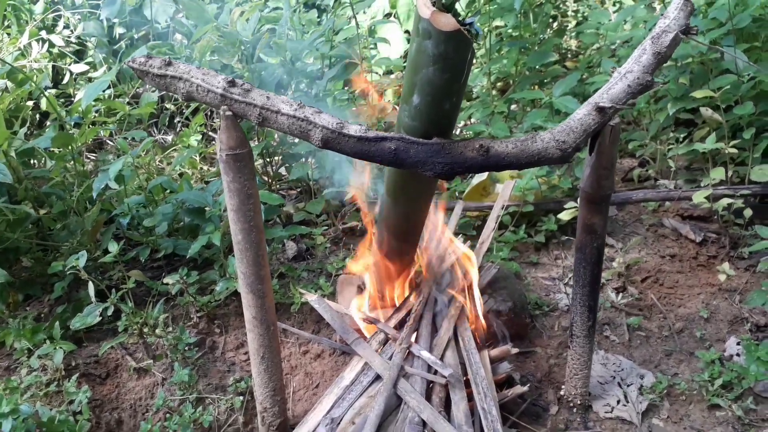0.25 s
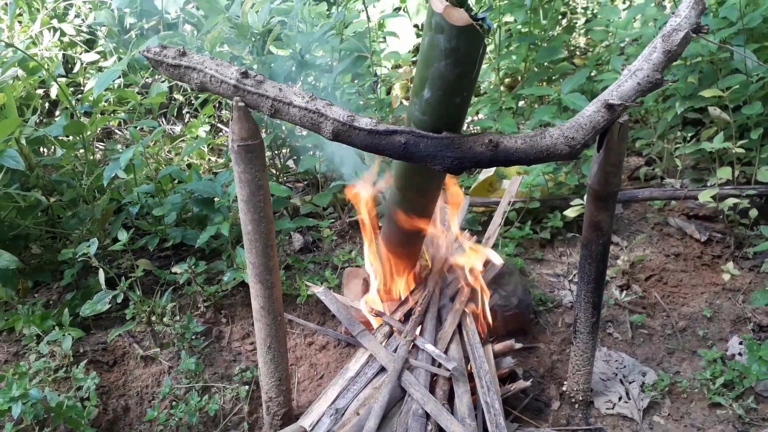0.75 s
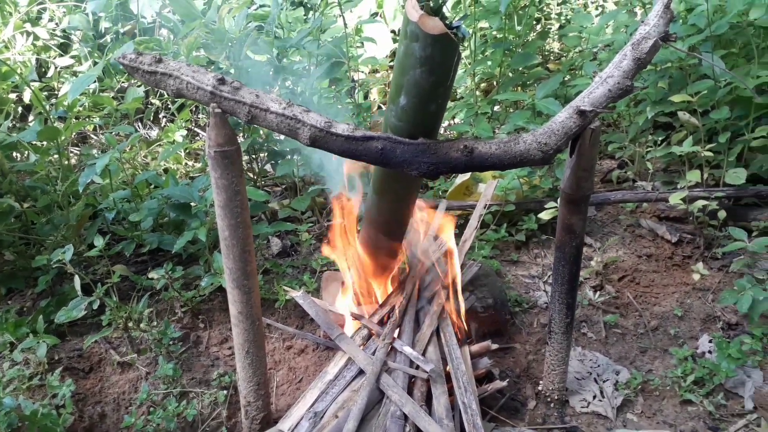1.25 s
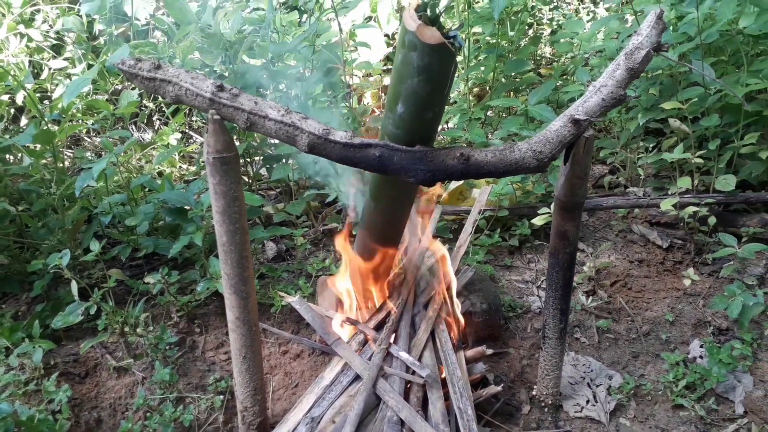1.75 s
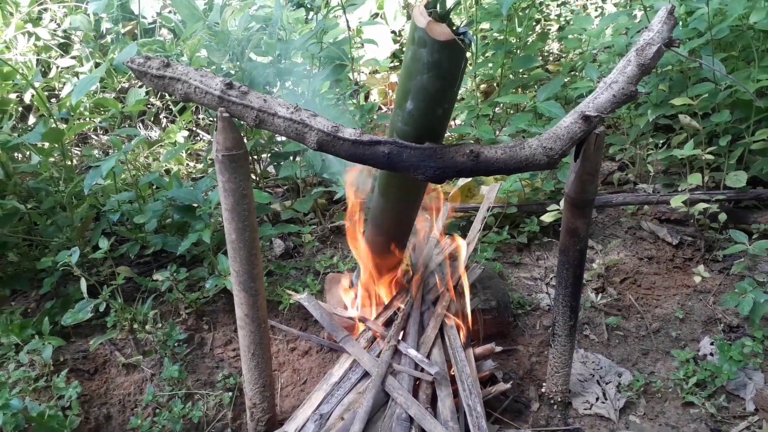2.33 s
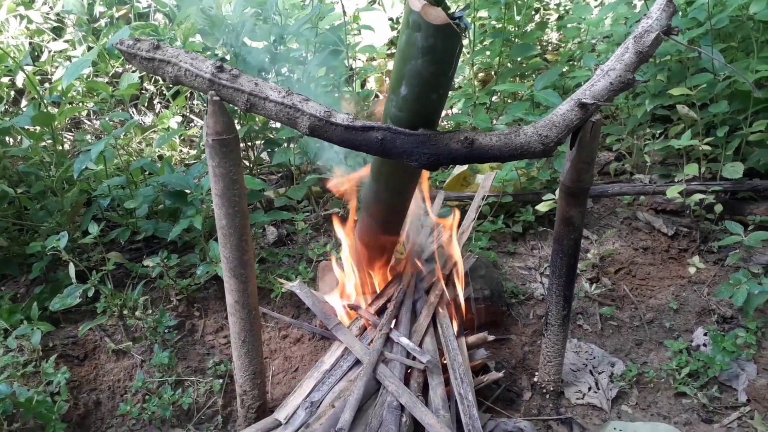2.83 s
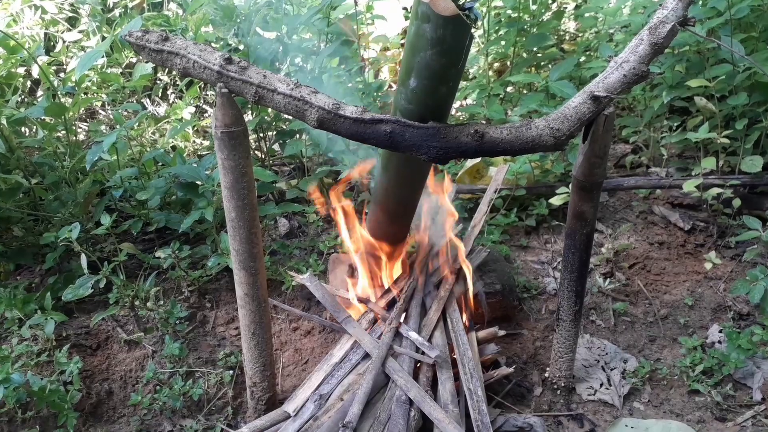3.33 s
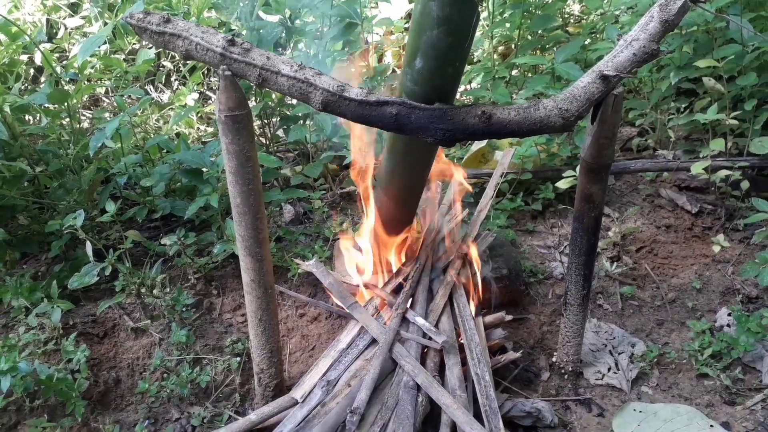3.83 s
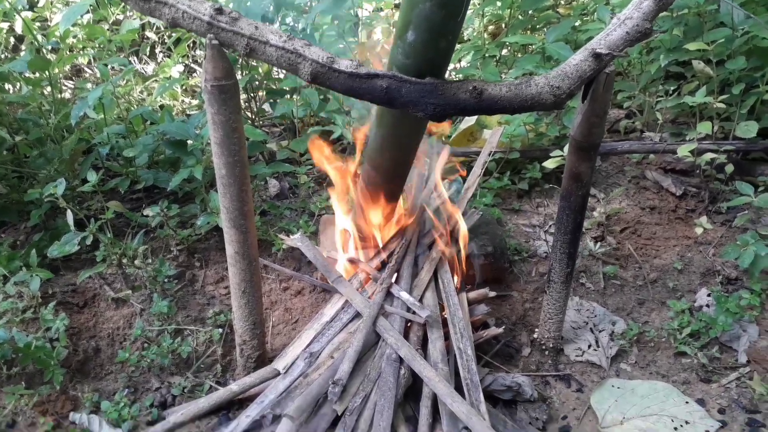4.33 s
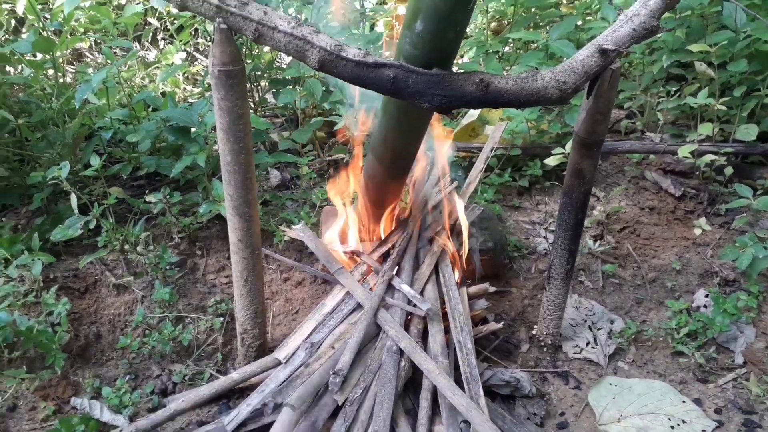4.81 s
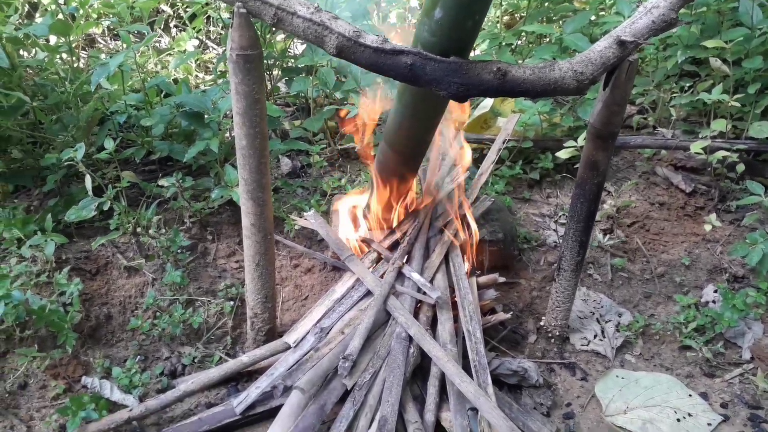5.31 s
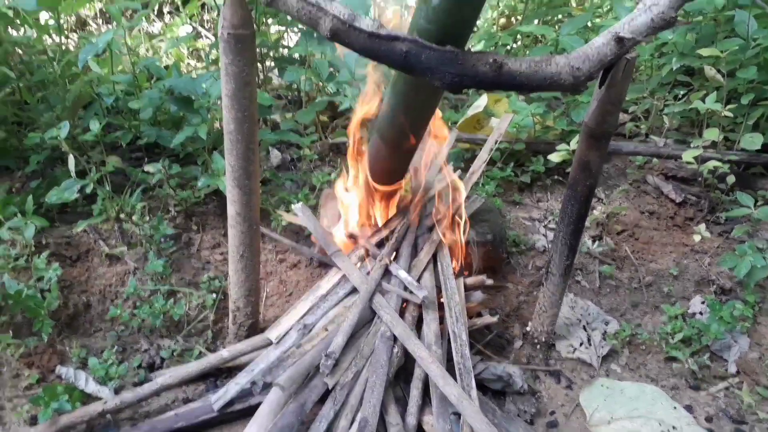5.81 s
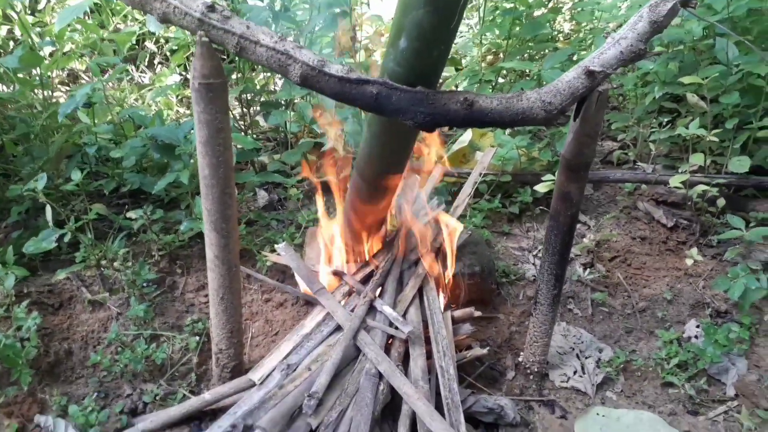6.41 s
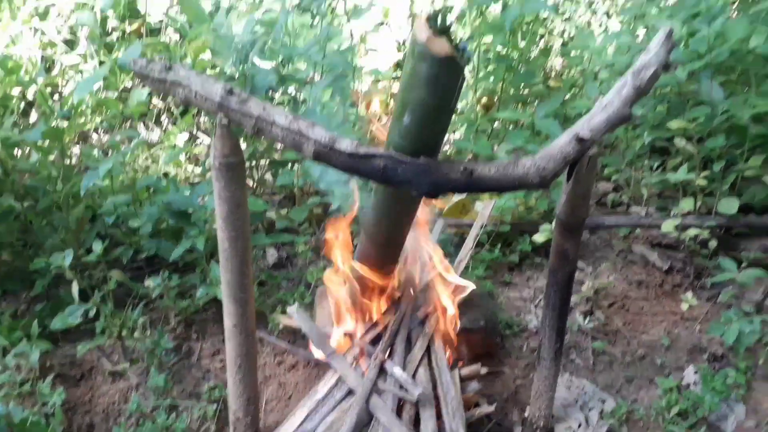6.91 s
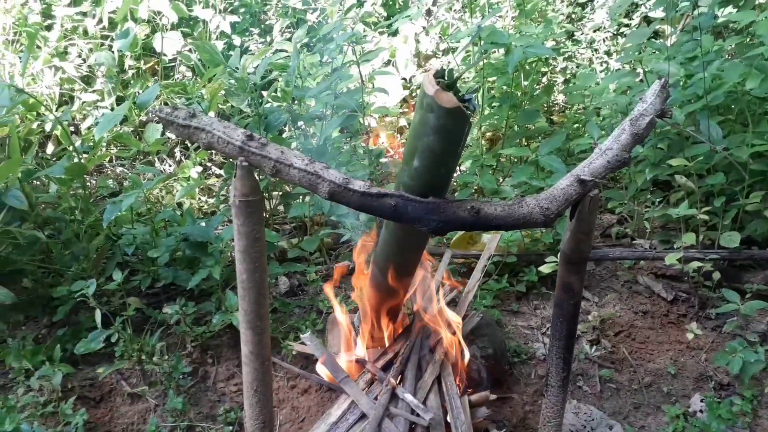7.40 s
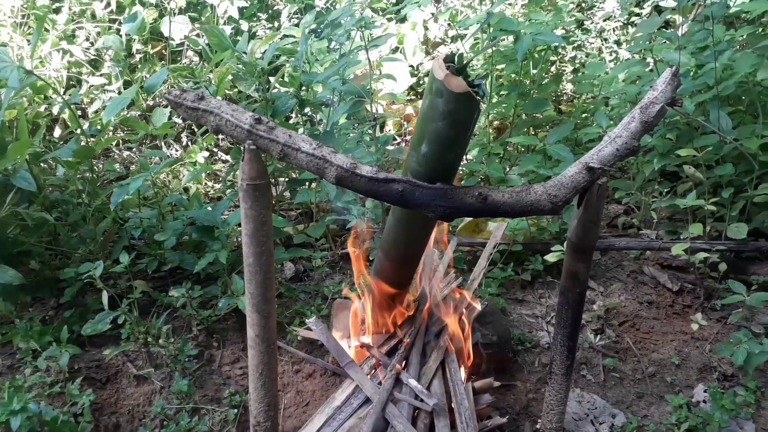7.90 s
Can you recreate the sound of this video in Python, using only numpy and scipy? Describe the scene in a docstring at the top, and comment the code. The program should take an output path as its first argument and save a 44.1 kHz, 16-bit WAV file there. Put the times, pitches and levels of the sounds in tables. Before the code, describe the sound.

Outdoors in dense greenery, a narrow high cicada drone swells slightly and holds. A small wood fire flutters low, sizzles and snaps close by. A nearer cicada winds up before three seconds and stays. Brief squeaky chirps, like steam through a wet crack, come after two seconds and far stronger after five. Soft insect rasps and faint distant birds lie behind. Near-mono pickup, short leafy reverberation.

```python
"""Cicadas drone over a small wood fire that flutters and hisses under a green bamboo tube in the jungle.
A nearer cicada joins in, another insect pulses and birds call far off, close to mono throughout.
Filtered noise makes the drone, flames, hiss and gas jets; a comb of sines sings the near cicada.
The wood pops as shaped pulses, and two flurries of squeaky chirps stand out, probably steam spitting
through a wet crack: short whistles, with noise that rings the modes of the crack."""
import sys
import numpy as np
from scipy import signal
from scipy.fft import rfft, irfft, next_fast_len
from scipy.io import wavfile
from scipy.ndimage import uniform_filter1d

SR = 44100
rng = np.random.default_rng(int(sys.argv[2]) if len(sys.argv) > 2 else 0)


def to_wav(sig):
    """Store sig (one row per channel, or 1-D mono) as 16-bit WAV at the path in sys.argv[1].

    Samples outside -1..1 are clipped; the rate is SR.
    """
    pcm = np.clip(np.atleast_2d(sig), -1, 1) * 32767
    pcm = np.round(pcm).astype(np.int16)
    wavfile.write(sys.argv[1], SR, pcm.T)  # frames by channels


N = 359415
TIME = np.arange(N) / SR

# whistles of the large squeaks: (start t/s, peak level/dB, length t/ms)
LARGE_SQUEAKS = [(.7583, -44.5, 6.4), (.892, -47, 6.2), (2.268, -40, 5.6), (2.2965, -33.5, 12),
                 (2.3955, -31.5, 5.5), (2.473, -40.5, 20), (2.516, -40, 6.8), (4.8855, -37.5, 9),
                 (5.0226, -36.5, 6.6), (5.077, -32.5, 9), (5.1866, -26.5, 6.9), (5.2241, -32, 6.3),
                 (5.2588, -25, 4.4), (5.275, -25, 14), (5.282, -30.5, 13), (5.322, -20.5, 6.1),
                 (5.3528, -30, 9.7), (5.6654, -31.5, 6.4), (5.7076, -37, 32), (5.739, -34, 12),
                 (5.7663, -31, 23), (5.7963, -21.5, 8.6), (5.809, -29, 9.5), (5.8972, -32, 10),
                 (5.924, -32.5, 9.2)]


def amp(db):
    """Level as the logarithm of amplitude: decibels to gain."""
    return 10 ** (np.asarray(db) / 20)


def unit(x):
    """Normalization of mean power: scales to an rms of one."""
    return x / np.sqrt(np.mean(abs(x) ** 2) + 1e-20)


def read(points, hz):
    """Interpolation on a logarithmic frequency axis between the points of a curve."""
    f, value = np.transpose(points)
    return np.interp(np.log(hz + 1), np.log(f + 1), value)


def add(mix, s, sound):
    """Superposition: adds a sound into the mix from time s."""
    part = mix[max(round(s * SR), 0):][:len(sound)]
    part += sound[:len(part)]


def colour(x, db_at):
    """Spectral shaping by a gain in dB given as a function of frequency; rms one."""
    size = next_fast_len(len(x))
    gain = amp(db_at(np.fft.rfftfreq(size, 1 / SR)))
    return unit(irfft(rfft(x, size) * gain, size)[:len(x)])


def coloured_noise(points):
    """Noise of rms one with the spectral envelope drawn by the points."""
    return colour(rng.standard_normal(N), lambda f: read(points, f))


def wander(rate_hz):
    """Slow random modulation: chance values joined by straight lines, rms one."""
    knots = rng.standard_normal(8192)
    return unit(np.interp(TIME * rate_hz * 2, np.arange(len(knots)), knots))


def resonate(x, hz, width_hz):
    """A second-order resonance with a peak gain of one."""
    b, a = signal.iirpeak(min(hz, SR / 2 - 1), hz / width_hz, SR)
    return signal.lfilter(b, a, x)


def resonate_twice(x, hz, width_hz):
    """Two equal resonances in cascade, for steeper skirts."""
    return resonate(resonate(x, hz, width_hz), hz, width_hz)


def forest(x):
    """Reverberation by scatter from leaves and trunks: decaying noise whose treble dies first."""
    # reverberation time: (f/Hz, t60/s)
    decay_times = [(300, 0.26), (1500, 0.22), (12000, 0.21)]
    hz, t, z = signal.stft(rng.standard_normal(SR // 2), SR, nperseg=256)
    decay = amp(-60 * t / read(decay_times, hz)[:, None])
    onset = np.minimum(t / 0.0054, 1)
    tail = signal.istft(z * decay * onset, SR, nperseg=256)[1]
    return signal.oaconvolve(x, tail / np.linalg.norm(tail))[:N]


def chorus(level_db=-49.5, growth_db_per_s=1.1, full_s=2.8):
    """Incoherent summation: countless far cicadas swell and merge into one narrow shimmering band."""
    # spectral envelope of the far cicadas: (f/Hz, relative level/dB)
    envelope = [(7300, -42), (7750, -37), (7900, -2), (8150, -4.5), (8450, 4), (8600, 1), (8720, -8),
                (8860, -5.5), (9020, -41), (9600, -82)]
    swell_db = -growth_db_per_s * np.maximum(full_s - TIME, 0)
    shimmer_db = .5 * wander(7.1)
    return amp(level_db + swell_db + shimmer_db) * coloured_noise(envelope)


def birds():
    """Multipath fading: gliding far notes are smeared by many paths through the trees."""
    # calls: (start t/s, length t/s, first f/Hz, last f/Hz, blur rate f/Hz, rms level before the taper/dB)
    calls = [(0.948, 0.89, 1420, 1530, 85, -75), (1.143, 1, 1950, 1744, 230, -71),
             (1.151, 0.57, 2290, 2330, 152, -73.5), (2.703, 0.21, 1780, 1760, 119, -74.5),
             (2.902, 0.373, 1540, 1600, 121, -76), (5.532, 0.49, 1326, 1400, 27, -69.5),
             (6.055, 0.172, 576, 614, 20.37, -71.5), (6.204, 0.12, 1423, 1400, 53, -75),
             (6.096, 0.48, 2480, 2630, 159.4, -74), (6.08, 0.37, 3520, 3650, 350, -68),
             (7.65, .45, 1450, 2100, 200, -80.5)]
    out = np.zeros(N)
    for s, length, first_hz, last_hz, blur_hz, db in calls:
        size = int(length * SR)
        paths = unit((wander(blur_hz) + 1j * wander(blur_hz))[:size])
        phase = 2 * np.pi * np.cumsum(np.linspace(first_hz, last_hz, size)) / SR
        note = (paths * np.exp(1j * phase)).real
        add(out, s, amp(db) * unit(note) * signal.windows.tukey(size, .8))
    return out


def pulsing_insect(hz=5130, width_hz=450, spread_s=0.059, first_db=-63, last_db=-57):
    """Amplitude modulation of resonant noise: soft rasps, over two a second in each bout, slowly growing."""
    # bouts of phrases: (crest of first phrase t/s, end t/s)
    bouts = [(.9, 5.6), (6.2, 7.8)]
    phrase_every_s = .451
    crests = np.concatenate([np.arange(first, end, phrase_every_s) for first, end in bouts])
    phrases = sum(np.exp(-.5 * ((TIME - s) / spread_s) ** 2) for s in crests)
    growth = amp(np.linspace(first_db, last_db, N))
    rasp = rng.standard_normal(N) * amp(2.26 * wander(60))
    return phrases * growth * unit(resonate_twice(rasp, hz, width_hz))


def cicada(width_hz=75, side_hz=270, side_db=-12, jitter=0.001814, drift=.001, flutter_db=1.95,
           wet_db=-6, sway_hz=25, sway_db=-0.22):
    """Source and filter: even tymbal strokes make a comb of lines; two modes of the abdomen select."""
    start_s, wind_up_s = 2.69, 0.23
    full_hz, wind_up_hz, tymbal_hz = 8456, 520, 64.2
    level_db, crescendo_db_per_s = -46, 0.37
    age = np.maximum(TIME - start_s, 0)
    effort = 1 - np.exp(-age / wind_up_s)
    mode_hz = full_hz - wind_up_hz * (1 - effort) + sway_hz * wander(1.645)
    level = effort * amp(level_db + crescendo_db_per_s * age + sway_db * wander(1.484))
    rate_hz = tymbal_hz * (1 + jitter * wander(25) + drift * wander(2))
    stroke = np.cumsum(rate_hz) / SR

    def mode(off_hz):
        """Resonance curve: the gain falls with distance from the mode."""
        return 1 / (1 + (off_hz / width_hz) ** 2)

    song = np.zeros(N)
    for k in range(122, 140):  # harmonics of the stroke rate
        off_hz = k * tymbal_hz - mode_hz
        gain = mode(off_hz) + amp(side_db) * mode(off_hz + side_hz)  # the second mode lies lower
        path = rng.random() + 0.19 * wander(1)  # swaying leaves shift each line's phase
        song += gain * np.sin(2 * np.pi * (k * stroke + path))
    song *= amp(flutter_db * wander(20))
    return level * unit(song + amp(wet_db) * forest(song))


def flames(level_db=-64, puffs_db=-12, puffs_hz=240):
    """Turbulence noise: a low flutter, with soft uneven puffs as the flames lick upward."""
    # envelope of the flutter and the quiet of the forest: (f/Hz, relative level/dB)
    envelope = [(20, -26), (40, -14), (80, 0), (115, 0.5), (170, -3), (260, -14.5), (400, -23.5),
                (1000, -26.5), (5000, -30.5)]
    flutter = amp(2.1 * wander(7)) * coloured_noise(envelope)
    gusts = rng.standard_normal(N) * amp(5.8 * wander(13))
    puffs = unit(resonate_twice(gusts, puffs_hz, puffs_hz))
    return amp(level_db) * (flutter + amp(puffs_db) * puffs)


def sizzle(level_db=-61.5, boil_s=.11, ticks_per_s=160, ticks_db=-12, spread_db=6, patchy_db=2.0):
    """Boiling as noise and random impulses: sap hisses and ticks, cracks come and go, boils swell."""
    # spectral envelope of the sizzle: (f/Hz, relative level/dB)
    envelope = [(1200, -25), (2200, -12), (3100, -7.5), (3900, 2), (5000, 5.5), (6600, 3.5), (7600, 5),
                (9300, -2), (10600, -13), (12800, -9), (15500, -14)]
    # boils of the sap above the steady level: (crest t/s, rise in level/dB)
    boils = [(.6, 2.5), (1.08, 1.5), (2.17, 8), (2.88, 7.5), (3.2, 5), (3.55, 4.5), (4.22, 5), (4.85, 2.5),
             (5.28, 8.5), (6.3, 5), (6.82, 7), (7.42, 6.5), (7.9, 5.5)]
    size = amp(spread_db * np.minimum(rng.exponential(1, N), 3)) * rng.choice([-1, 1], N)
    ticks = unit(size * (rng.random(N) < ticks_per_s / SR))
    cracks = np.zeros(N)
    for hz in 2000 * np.sqrt(2) ** np.arange(7):  # half-octave steps
        cracks += resonate(rng.standard_normal(N), hz, hz / 2) * amp(patchy_db * wander(4))
    hiss = unit(cracks) * amp(2.03 * wander(20)) + amp(ticks_db) * ticks
    rise_db = sum(db * np.exp(-.5 * ((TIME - s) / boil_s) ** 2) for s, db in boils)
    return amp(level_db + rise_db) * colour(hiss, lambda f: read(envelope, f))


def jets(octaves=1.38, rise_share=0.24, sputter_db=2.0):
    """Jet noise: pockets of gas open quickly, sputter and run out as bands of turbulence."""
    # gas jets from the wood: (start t/s, length t/s, level before the rise and fall/dB, centre f/Hz)
    gas_jets = [(.192, 0.29, -55, 5100), (0.848, 0.13, -62.5, 2070), (1.96, 0.13, -45, 4100),
                (2.055, 0.2, -53, 4330), (4.611, 0.16, -61.5, 2430), (4.973, 0.33, -62.5, 2700),
                (5.358, 0.19, -49, 5000), (7.298, 0.11, -63, 2000)]
    out = np.zeros(N)
    gas = rng.standard_normal(N) * amp(sputter_db * wander(120))
    for s, length, db, hz in gas_jets:
        low_hz, high_hz = hz / 2 ** (octaves / 2), hz * 2 ** (octaves / 2)
        part = gas[int(s * SR):][:int(length * SR)]
        u = np.linspace(0, 1, len(part))
        flow = np.minimum(u / rise_share, (1 - u) / (1 - rise_share))
        band = lambda f: -10 * np.log10((1 + (low_hz / (f + 1)) ** 6) * (1 + (f / high_hz) ** 6))
        add(out, s, amp(db) * colour(part, band) * flow)
    return out


def pops(splinter_db=-9):
    """Impulse response: a snapping fibre gives a pulse and dying splinters; thuds are the same, but low."""
    # loudest pops of the wood: (t/s, peak level/dB, centre f/Hz, width/octaves, splinter decay t/ms)
    snaps = [(.4762, -26.5, 1400, 0.76, 0.35), (2.096, -30, 5500, 0.39, 2),
             (2.1897, -34.5, 4100, 0.21, 0.46), (2.8953, -20.5, 6700, 0.7, 1.13),
             (3.093, -26, 7600, 0.15, 1.5), (3.464, -38, 1440, 0.23, 1.4), (3.464, -36, 3580, 0.16, 2.7),
             (3.583, -32.5, 6450, 2.9, .87), (3.7562, -33, 3800, 0.67, 0.94), (4.078, -44, 2680, .25, 2.9),
             (4.2467, -30, 4480, 0.87, 1.5), (4.395, -47, 2660, 0.18, 2.1), (4.755, -36.5, 5000, .29, 7.5),
             (7.485, -33.5, 8100, 0.73, 3.5), (7.8075, -31, 4960, 0.44, 1.4),
             (7.863, -41.5, 3700, 0.19, 1.5), (8.0663, -31.5, 5900, 0.47, 0.77)]
    # dull thuds of the burning sticks: (t/s, peak level/dB)
    thuds = [(0.4757, -37.5), (1.621, -43.5), (3.302, -52)]
    thud_hz, thud_octaves, thud_decay_ms = 340, 0.79, 2.9
    out, t = np.zeros(N), np.arange(4096) / SR
    f = abs(np.fft.fftfreq(len(t), 1 / SR)) + 1
    dull = [(s, db, thud_hz, thud_octaves, thud_decay_ms) for s, db in thuds]
    for s, db, hz, octaves, decay_ms in list(snaps) + dull:
        splinters = rng.standard_normal(len(t)) * np.exp(-t * 1000 / decay_ms)
        snap = (t == 0) + amp(splinter_db) * splinters
        log_gain = -1.5 * np.log(1 + (np.log2(f / hz) / octaves) ** 2 / 2)
        # minimum phase, so that nothing sounds ahead of the snap
        response = np.exp(np.conj(signal.hilbert(log_gain)))
        pop = np.fft.ifft(np.fft.fft(snap) * response).real
        add(out, s, amp(db) * pop / abs(pop).max())
    return out


def steam_db(s, rise_db=11.5):
    """Build-up and collapse of pressure: each flurry of steam rises to its crest and falls, at times s."""
    # flurries: (start t/s, crest t/s, end t/s, crest level of the small squeaks/dB)
    flurries = [(.6, 0.957, 1.15, -57), (2.2, 2.35, 2.65, -61), (4.733, 4.982, 5.16, -42),
                (5.132, 5.25, 5.335, -27), (5.72, 5.804, 5.89, -34), (5.903, 5.96, 5.98, -41)]
    levels = []
    for start, crest, end, db in flurries:
        away = np.maximum((crest - s) / (crest - start), (s - crest) / (end - crest))
        levels.append(db - rise_db * away ** 2)
    return np.max(levels, axis=0)


def small_squeaks(spread_db=4, length_ms=9, length_spread=.3):
    """Stochastic release: steam stutters out, pausing before each large squeak; rows as LARGE_SQUEAKS."""
    squeaks_per_s, idle_db, pause_s = 80, -62.5, .014
    slots = np.arange(int(N / SR * squeaks_per_s))
    when = (slots + rng.random(len(slots))) / squeaks_per_s
    size, length = rng.standard_normal((len(slots), 2)).T
    level_db = np.maximum(steam_db(when), idle_db) - spread_db * abs(size)
    rows = zip(when, level_db, length_ms * np.exp(length_spread * length))
    return [row for row in rows if not any(s - pause_s < row[0] < s for s, _, _ in LARGE_SQUEAKS)]


def squeaks(hz=5180, rise_s=0.001, waver_hz=120, loud_spit_db=-9, small_spit_db=-12, spit_limit_db=-37,
            spit_share=0.66, shift_db=3.0, dribble_db=-15, idle_db=-71, spray_db=-20):
    """Whistle and forced resonance: each spit rattles the crack and whistles for some milliseconds."""
    # modes of the crack: (f/Hz, half the bandwidth of each cascaded resonance f/Hz, relative level/dB)
    modes = [(4100, 110, -14), (5160, 275, 6), (5680, 340, 2), (6500, 250, 2), (11800, 94, -14),
             (12580, 120, -6.5), (13140, 310, -18)]
    whistles, spits = np.zeros(N), np.zeros(N)
    pitch = hz + waver_hz * wander(45)
    for rows, spit_db in [(LARGE_SQUEAKS, loud_spit_db), (small_squeaks(), small_spit_db)]:
        for s, db, length_ms in rows:
            span = slice(int(s * SR), int(s * SR) + SR // 20)
            t = TIME[span] - TIME[span][0]
            u = t * 1000 / length_ms
            blow = (1 - np.exp(-t / rise_s)) * np.maximum(1 - u ** 2, 0)
            tone = np.sin(2 * np.pi * np.cumsum(pitch[span]) / SR)
            add(whistles, s, amp(db) * blow / blow.max() * tone)
            add(spits, s, amp(min(db + spit_db, spit_limit_db)) * np.exp(-u / spit_share))
    # small spits dribble out all the time, and more of them in the flurries and around the large ones
    whistle_rms = np.sqrt(abs(uniform_filter1d(whistles ** 2, SR // 20)))
    flow = amp(idle_db) + amp(spray_db + steam_db(TIME)) + amp(dribble_db) * whistle_rms
    dribble = flow * unit(amp(5.3 * np.minimum(wander(70), 2)))
    spray = (spits + dribble) * unit(rng.standard_normal(N) * amp(4.9 * wander(500)))
    rattle = np.zeros(N)
    for f, half_width, db in modes:
        drive = spray * amp(shift_db * wander(20))  # the balance of the modes keeps shifting
        rattle += amp(db) * resonate_twice(drive, f, 2 * half_width)
    return whistles + spray.std() * unit(rattle)


def scene():
    """Superposition of all sources in the middle; only a faint hiss differs between the ears."""
    fire = pops() + squeaks() + jets()
    background = chorus() + birds() + pulsing_insect() + cicada()
    mid = background + flames() + sizzle() + fire + amp(-12) * forest(fire)
    air = [(200, -3.5), (800, -8.5), (8000, -7.5), (12500, -4.5)]  # (f/Hz, relative level/dB)
    side = amp(-82) * coloured_noise(air)
    return np.array([mid + side, mid - side])


def record(dry):
    """Band limitation: a linear-phase low-pass stands for the recorder's upper limit."""
    edge_hz = 15800
    low_pass = signal.firwin(801, edge_hz, window=("kaiser", 9), fs=SR)
    return signal.oaconvolve(dry, low_pass[None], "same")


dry = scene()
out = record(dry)
to_wav(out)
```